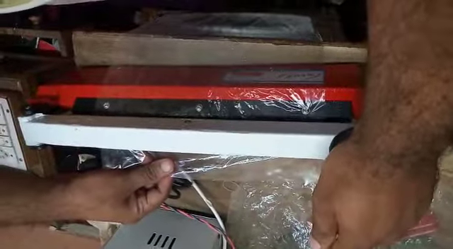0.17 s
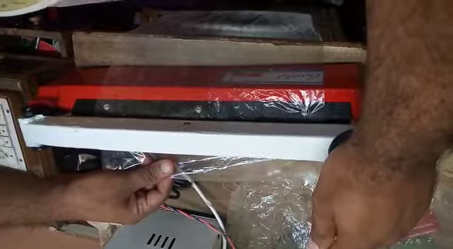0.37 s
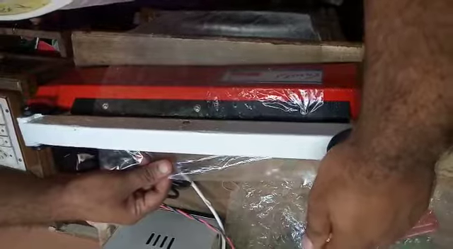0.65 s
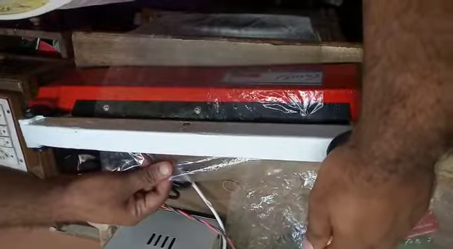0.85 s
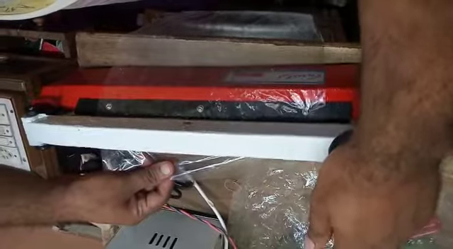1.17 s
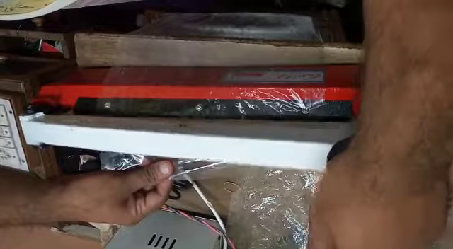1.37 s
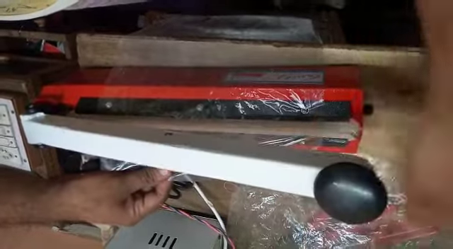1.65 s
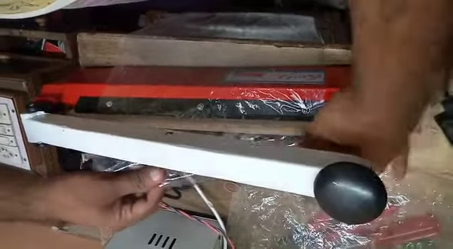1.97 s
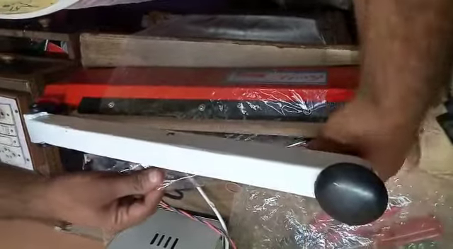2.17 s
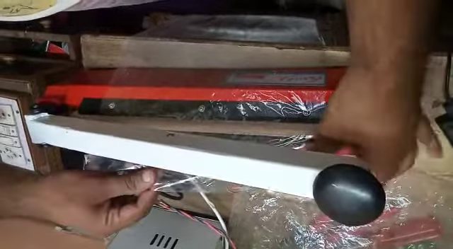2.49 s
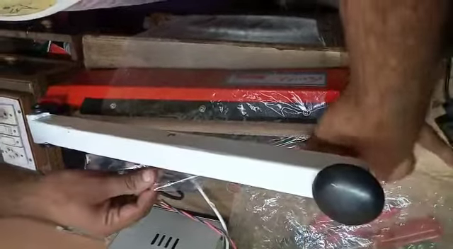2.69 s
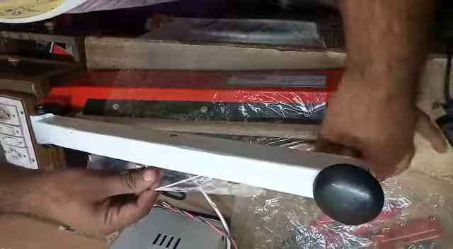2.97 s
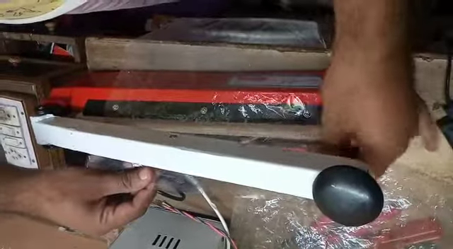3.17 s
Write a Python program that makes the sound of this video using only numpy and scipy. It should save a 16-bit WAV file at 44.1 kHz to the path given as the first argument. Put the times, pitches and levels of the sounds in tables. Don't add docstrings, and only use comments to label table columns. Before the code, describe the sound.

A hand sealer on a bench: its catch clicks at 1.0 s, the switch snaps sharply at 1.3, and the lever clacks at its stop at 1.5, thudding and bouncing until 1.65. Before, a distant knock rattles at 0.1. Film ticks and rustles softly, busiest near 1.1 and 2.9-3.3, with faint bench booms. Steady fan rush and hum around 400 Hz; small room, close microphone, dull treble.

```python
import sys
import numpy as np
from scipy import signal
from scipy.fft import rfft, irfft, next_fast_len
from scipy.io import wavfile
from scipy.ndimage import uniform_filter1d, map_coordinates

SR = 44100
rng = np.random.default_rng(int(sys.argv[2]) if len(sys.argv) > 2 else 0)


def materialize(psi):
    bounded = np.clip(np.atleast_2d(psi).T, -1, 1)
    quanta = np.round(bounded * 32767).astype(np.int16)
    wavfile.write(sys.argv[1], SR, quanta)


def linear_from_db(decibels):
    return 10 ** (np.asarray(decibels, float) / 20)


N = 147294

# (frequency [Hz], level [dB rms])
MAINS_TONES = [(401.4, -40.5), (97, -59), (48.7, -65.5)]
# (frequency [Hz], density [dB per Hz])
FAN_BODY = [(25, -48), (45, -19.5), (65, -14), (97, -8.5), (135, -9.5), (240, -6), (335, 0), (470, -7.5)]
# (frequency [Hz], density [dB per Hz])
FAN_AIR = [(300, -15.5), (520, 3), (870, 2.5), (1100, 2.5), (1600, 0.5), (2300, -3), (3300, -10),
           (15500, -16)]
# (time [s], level [dB])
AIR_FLOW = [(0.0, -43.5), (0.4, -43), (0.92, -43.5), (1.22, -42), (2.82, -43.5), (3.34, -44)]

# (time [s], level [dB], length [s], brightness
FILM_TICKS = [(1.59, -31.5, 0.011, -0.29), (0.275, -46, .01, 1.4), (0.294, -41.5, .03, -0.53),
              (1.066, -32.5, 0.012, .6), (1.087, -31, .01, .9), (1.172, -40, .004, 1.4),
              (1.249, -35.5, 0.02, 0.37), (2.015, -38, .008, 1.3), (2.1355, -35, .004, .9),
              (2.338, -42, .004, .6), (2.495, -37.5, .006, 0.3), (2.7995, -35, 0.0043, .8),
              (2.894, -31, .005, 0.56), (2.926, -31.5, 0.0094, 0.15), (3.166, -31, .008, -0.1),
              (3.187, -42, 0.0073, .6), (3.176, -24.5, .012, 1.2), (3.2176, -37, .006, .8),
              (3.331, -30.5, 0.013, .9), (.002, -33, 0.032, 1.1)]
# (time [s], level [dB], length [s])
BENCH_BOOMS = [
    (0.077, -37.5, 0.057),
    (1.04, -38.5, .05),
    (3.221, -40.5, 0.047),
]
# (centre time [s], length [s], level [dB])
FILM_RUSTLES = [(0.444, 0.054, -45), (0.862, 0.049, -41.5), (1.08, 0.032, -37), (1.794, .06, -45.5),
                (2.04, 0.027, -42.5), (2.278, .06, -45), (3.183, 0.019, -35.5), (3.222, 0.049, -39),
                (3.31, 0.015, -50.5)]

# (time [s], ring level [dB], crack level [dB], rattle length [s], brightness slope [power of frequency])
KNOCK_BLOWS = [
    (.1162, -31.5, -36, 0.0053, -0.15),
    (.121, -30.5, -39.5, 0.031, -0.35),
    (.238, -43, -37, 0.012, -0.45),
]
CATCH_BLOWS = [
    (1.0195, -54, -26.5, .007, 0.63),
    (1.0265, -33.5, -23.5, 0.01, 0.83),
]
SWITCH_BLOWS = [
    (1.3108, -25.5, -20, 0.014, 0.88),
]
STOP_BLOWS = [
    (1.5198, -36, -24, 0.0038, 0.18),
    (1.5235, -28.5, -25.5, .01, 0.18),
]
REBOUND_BLOWS = [
    (1.638, -55, -33, .012, 0.0073),
    (1.642, -34.5, -56, 0.013, 0),
]
BASE_BLOWS = [
    (1.599, -34.5, -68, 0.0056, 0),
    (1.622, -41.5, -77, .01, 0),
]

# (frequency [Hz], level [dB], decay t60 [s])
BENCH_MODES = [(496, 0.5, .07), (910, -22, 0.045), (1245, -4.5, 0.045), (1426, 1, 0.041), (1700, 0, 0.016),
               (1910, 5.5, 0.021), (2360, -1, 0.018), (2500, -13, 0.021), (4040, -3, 0.017),
               (6200, 6.5, 0.007)]
HOOK_MODES = [(1585, -2.5, .025), (2100, -1.5, 0.014), (2980, -4, 0.0081), (4940, 1, 0.0099)]
CASE_MODES = [(535, -3, 0.12), (1053, -14.5, .06), (1550, -4, 0.02), (1860, -4, 0.022), (2680, -0.5, 0.033),
              (4250, -2.5, .018), (4720, 10.5, .025), (6040, 2.5, 0.016), (7620, 6, .015),
              (13800, -7, 0.0039)]
LEVER_MODES = [(490, -6, 0.057), (603, 1, 0.075), (1480, -6, .03), (1812, 2, 0.029), (2043, 5.5, 0.025),
               (3428, -12, 0.16), (3310, 1.5, .012), (4400, -17, 0.013), (6627, -17, 0.085)]
SPRING_MODES = [(674, -16, .06), (2191, -4.5, 0.035), (2370, -7, 0.026), (3120, -10.5, 0.012),
                (4640, -2, 0.0089)]
FOOT_MODES = [(453, 4, 0.11)]

# (frequency [Hz], decay t60 [s])
ROOM_DECAY = [(200, 0.46), (2000, .25), (7000, .17), (14000, 0.11)]
# (frequency [Hz], level [dB])
MICROPHONE_RESPONSE = [(3000, 0.5), (4150, -4.5), (5400, -25.5), (6200, -19), (7700, -23), (9000, -33),
                       (12600, -37.5), (15000, -32)]


def unit(x):
    return x / np.sqrt(np.mean(x ** 2) + 1e-20)


def along(points, hz):
    f, v = np.transpose(points)
    return np.interp(np.log(hz + 1), np.log(f + 1), v)


def wobble(rate_hz):
    knots = rng.standard_normal(int(N * rate_hz / SR) + 4)
    return map_coordinates(knots, [np.arange(N) * rate_hz / SR])


def filtered(x, response):
    size = next_fast_len(len(x) + 4096)
    spectrum = rfft(x, size) * response(np.fft.rfftfreq(size, 1 / SR))
    return irfft(spectrum, size)[:len(x)]


def high_pass(hz, corner_hz):
    return hz ** 4 / (hz ** 4 + corner_hz ** 4)


def tilt(slope):
    return lambda hz: ((hz + 50) / 2000) ** slope * high_pass(hz, 600)


def add(out, start_s, x):
    part = out[round(start_s * SR):][:len(x)]
    part += x[:len(part)]


def burst(length_s, t60):
    t = np.arange(SR // 4) / SR
    rise = 1 - np.exp(-t / 0.00052)
    return rise * linear_from_db(-60 * np.maximum(t - length_s, 0) / t60)


def patchy(spectrum, low_end, patchy_db):
    z = signal.stft(rng.standard_normal(N + SR), nperseg=512)[2]
    field = uniform_filter1d(rng.standard_normal(z.shape), size=6, axis=0)
    field = uniform_filter1d(field, size=14, axis=1)
    x = signal.istft(z * linear_from_db(patchy_db * unit(field)), nperseg=512)[1][:N]
    return unit(filtered(x, lambda hz: linear_from_db(along(spectrum, hz)) * low_end(hz)))


def struck(blows, modes, crack_t60):
    out = np.zeros(N)
    t = np.arange(SR // 4) / SR
    rings = np.array([linear_from_db(db - 60 * t / t60) * np.sin(2 * np.pi * hz * t) for hz, db, t60 in modes])
    ring_size = np.linalg.norm(rings, axis=1, keepdims=True)
    for start_s, ring_db, crack_db, length_s, slope in blows:
        contacts = rng.laplace(size=len(t)) * burst(length_s / 2, length_s * 2)
        rung = signal.fftconvolve(contacts[None], rings, axes=1)[:, :len(t)]
        rung *= ring_size / np.linalg.norm(rung, axis=1, keepdims=True)
        body = filtered(rung.sum(axis=0), lambda hz: high_pass(hz, 300))
        body /= np.sqrt(np.mean(body[:SR // 50] ** 2))
        noise = unit(filtered(rng.standard_normal(len(t)), tilt(slope)))
        crack = noise * burst(length_s, crack_t60)
        add(out, start_s, linear_from_db(ring_db) * body + linear_from_db(crack_db) * crack)
    return out


def fan():
    t = np.arange(N) / SR
    s, db = np.transpose(AIR_FLOW)
    flow_db = np.interp(t, s, db) - db.mean()
    body = patchy(FAN_BODY, lambda hz: 1 / (1 + (hz / 520) ** 8), patchy_db=0.92)
    air = patchy(FAN_AIR, lambda hz: high_pass(hz, 380), patchy_db=1.06)
    body_gain = linear_from_db(-42 + 0.48 * wobble(2.6))
    air_gain = linear_from_db(-40.5 + flow_db + 0.13 * wobble(8.58))
    return body_gain * body + air_gain * air


def mains():
    t = np.arange(N) / SR
    out = np.zeros(N)
    for hz, db in MAINS_TONES:
        level = linear_from_db(db + 2.5 + 0.35 * wobble(17))
        out += level * np.sin(2 * np.pi * hz * t)
    return out


def film_ticks():
    out = np.zeros(N)
    for start_s, db, length_s, slope in FILM_TICKS:
        tick = unit(filtered(rng.standard_normal(SR // 4), tilt(slope)))
        add(out, start_s, linear_from_db(db) * tick * burst(length_s / 2, length_s * 3))
    return out


def bench_booms():
    out = np.zeros(N)
    t = np.arange(SR // 4) / SR
    boom = np.sin(2 * np.pi * 88.1 * t)
    for start_s, db, length_s in BENCH_BOOMS:
        swell = t / length_s * np.exp(-2 * t / length_s)
        add(out, start_s, linear_from_db(db + 10.5) * swell * boom)
    return out


def distant_knock():
    return struck(KNOCK_BLOWS, BENCH_MODES, crack_t60=0.16)


def film_rustles():
    t = np.arange(N) / SR
    swell = np.zeros(N)
    for centre_s, length_s, db in FILM_RUSTLES:
        swell += linear_from_db(db) * np.exp(-0.5 * ((t - centre_s) / length_s) ** 2)
    grains = rng.standard_normal(N) * linear_from_db(3 * wobble(170))
    return swell * unit(filtered(grains, tilt(0.33)))


def sealer():
    catch = struck(CATCH_BLOWS, HOOK_MODES, crack_t60=0.03)
    switch = struck(SWITCH_BLOWS, CASE_MODES, crack_t60=0.07)
    stop = struck(STOP_BLOWS, LEVER_MODES, crack_t60=0.04)
    base = struck(BASE_BLOWS, FOOT_MODES, crack_t60=0.03)
    rebound = struck(REBOUND_BLOWS, SPRING_MODES, crack_t60=0.03)
    return catch + switch + stop + base + rebound


def room(x):
    hz, t, z = signal.stft(rng.standard_normal(SR // 2), SR, nperseg=256)
    decay = linear_from_db(-60 * t / along(ROOM_DECAY, hz)[:, None])
    tail = signal.istft(z * decay, SR, nperseg=256)[1]
    delayed = np.pad(x, (300, 0))
    return signal.fftconvolve(delayed, tail / np.linalg.norm(tail))[:N]


def scene():
    bench = film_ticks() + bench_booms() + distant_knock() + film_rustles() + sealer()
    return (bench + linear_from_db(-8.5) * room(bench) + fan() + mains())[None]


def microphone(x):
    port_hz, port_width_hz, port_db, top_hz = 13600, 500, 6, 15450

    def response(hz):
        port = port_db * np.exp(-((hz - port_hz) / port_width_hz) ** 2)
        return linear_from_db(along(MICROPHONE_RESPONSE, hz) + port) / (1 + (hz / top_hz) ** 200)

    return filtered(x, response)


def low_pass(x):
    return signal.sosfilt(signal.butter(12, 15690, fs=SR, output="sos"), x)


def record(dry):
    mix = microphone(dry[0])[None]
    return low_pass(mix)


dry = scene()
out = record(dry)
materialize(out)
```